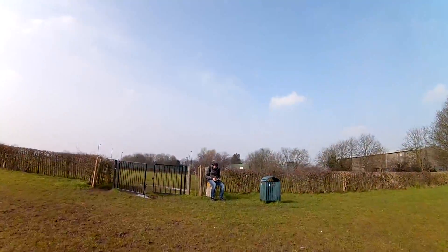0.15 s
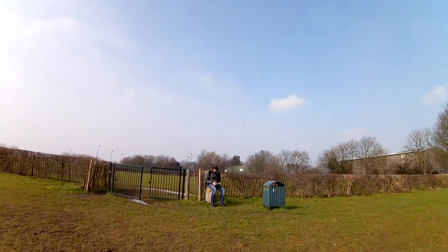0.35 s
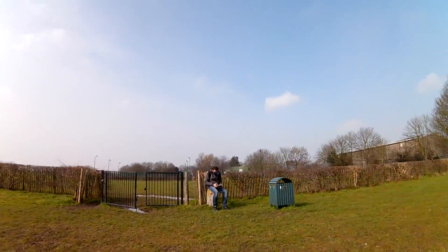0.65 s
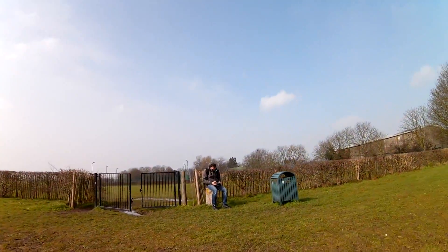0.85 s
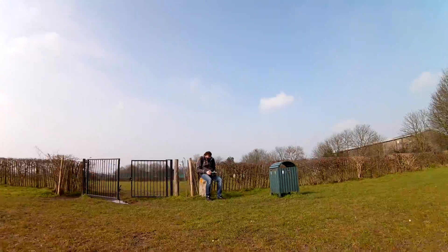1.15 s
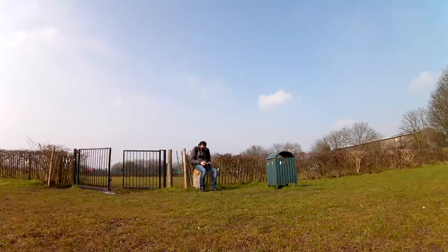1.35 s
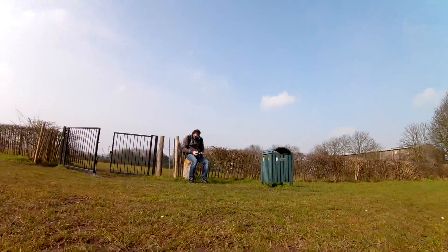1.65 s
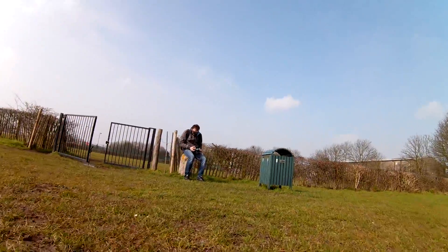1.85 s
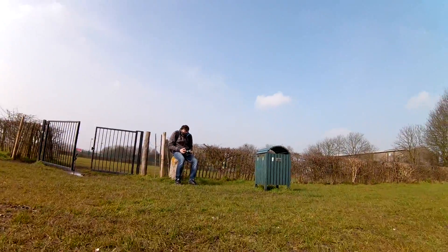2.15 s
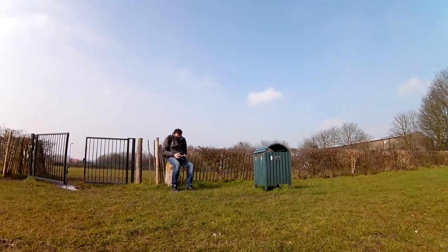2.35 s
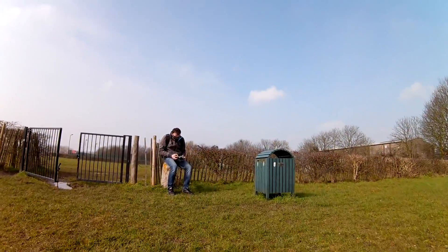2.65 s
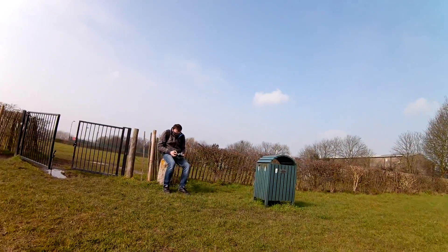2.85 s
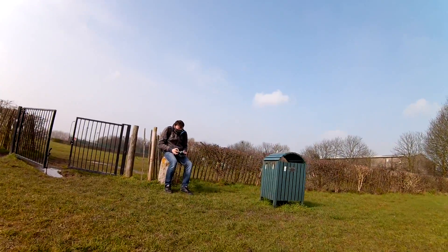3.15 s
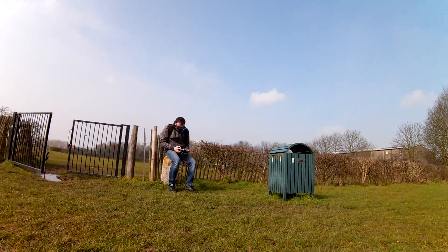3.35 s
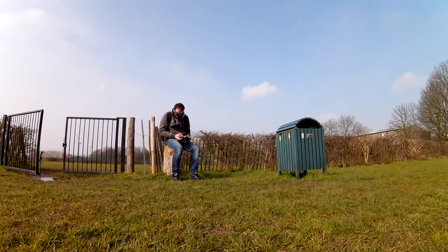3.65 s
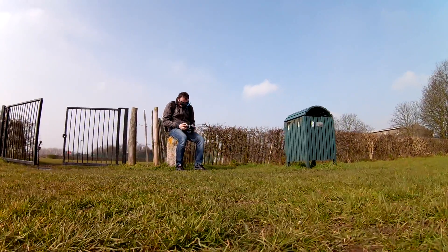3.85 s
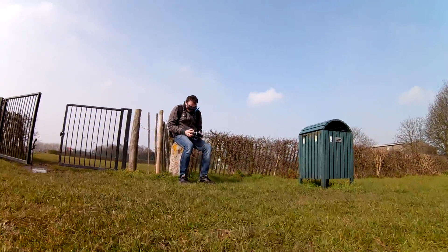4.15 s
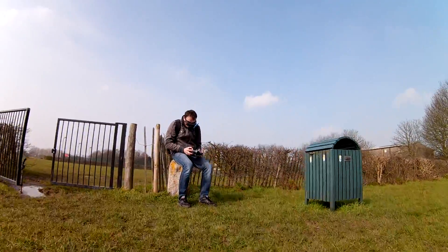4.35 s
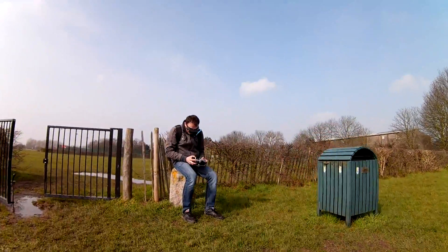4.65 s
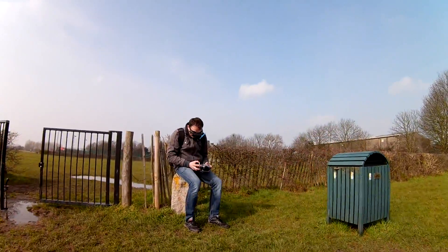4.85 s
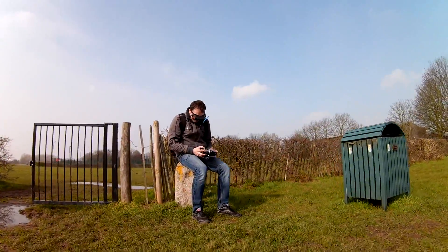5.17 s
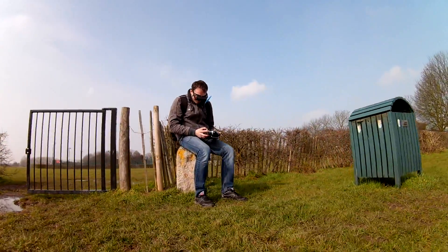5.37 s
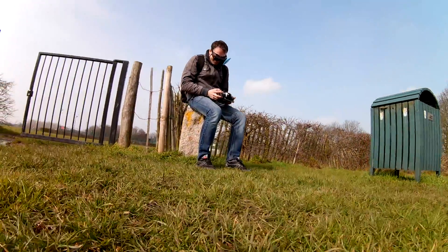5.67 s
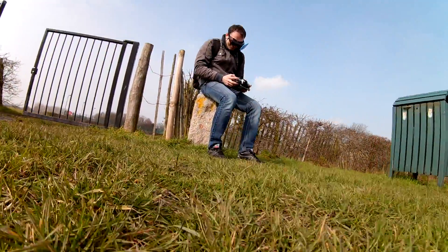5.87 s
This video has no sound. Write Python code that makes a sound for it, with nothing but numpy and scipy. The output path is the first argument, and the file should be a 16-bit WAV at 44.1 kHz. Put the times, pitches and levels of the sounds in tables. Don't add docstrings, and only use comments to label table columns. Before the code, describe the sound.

A microphone on a small racing quadcopter picks up a continuous harsh buzz from beating, slightly detuned rotors. The pitch dips, surges, sags and surges again with throttle. Propeller air hisses in fast pulses, a thin motor whine sits high above, and a loose plastic camera shell rattles in abrupt, distorted bursts. Open field, dry, close, mono, with little deep bass.

```python
import sys
import numpy as np
from scipy import signal
from scipy.fft import rfft, irfft
from scipy.io import wavfile
from scipy.ndimage import uniform_filter1d

SR = 44100
rng = np.random.default_rng(int(sys.argv[2]) if len(sys.argv) > 2 else 0)


def output_pcm(signal):
    pcm = np.clip(np.atleast_2d(signal).T, -1, 1) * 32767
    wavfile.write(sys.argv[1], SR, np.round(pcm).astype(np.int16))


def ratio(d):
    e = np.asarray(d, float) / 20
    return 10 ** e


N = 265041


def to_rms(x, rms_db):
    return x * ratio(rms_db) / np.sqrt(np.mean(x ** 2))


def curves(table):
    time_s, *columns = np.transpose(table)
    return [np.interp(np.arange(N) / SR, time_s, column) for column in columns]


def walk(rate_hz):
    hold = int(SR / rate_hz)
    steps = np.repeat(rng.standard_normal(N // hold + 1), hold)[:N]
    return 1.3 * uniform_filter1d(uniform_filter1d(steps, hold), hold)


def ring(x, hz, width_hz):
    return signal.lfilter(*signal.iirpeak(hz, hz / width_hz, SR), x)


def tone(turn):
    return np.sin(2 * np.pi * (turn + rng.random()))


def speeds():
    # (time [s], fast shaft [Hz], level [dB], slow shaft [Hz], level [dB])
    throttle = [(0, 352, -28, 325, -34), (.2, 331.4, -27.5, 299.3, -37), (.85, 324.6, -27, 286, -35.5),
                (1.0, 352, -26.5, 320.9, -33.5), (1.3, 419.5, -20.5, 390.6, -28.5),
                (2.08, 412.4, -25, 398, -25), (2.42, 406.3, -20, 397, -28), (2.7, 361.2, -27, 352, -33),
                (3.2, 361, -27, 349, -31.5), (3.8, 413.7, -21.5, 380, -27.5), (4.0, 458.1, -19, 414, -22),
                (4.33, 428.9, -20, 418, -27.5), (4.55, 322.5, -28.5, 312, -35),
                (4.9, 289.7, -33, 282, -39.5), (5.0, 343.6, -25.5, 333.2, -30.5),
                (5.25, 354.9, -25.5, 336, -31), (5.66, 448, -19, 398, -25.5),
                (6.01, 399, -21, 284.4, -36.5)]
    # (time [s], length [s], fast shaft change [Hz], slow shaft change [Hz])
    nudges = [(0.909, 0.044, -14.5, -7.5), (1.008, .04, 6.5, 2.5), (1.392, 0.051, 1, -6.5),
              (1.509, 0.067, -17, -9), (1.6, .04, -3, -12.5), (1.755, 0.066, 2.5, -7.5),
              (1.9, 0.065, -6, -11.5), (2.293, 0.075, -6, -4), (3.094, 0.051, -2, 1.5),
              (3.318, 0.052, 17, 9), (3.55, .12, 4, 14), (3.801, 0.051, 0, -5.5), (3.953, .03, 23.5, 16),
              (4.07, 0.038, 6.5, -3.5), (4.16, .05, -17, -4), (4.321, .04, 6, 2), (4.7, 0.045, 6, -4.5),
              (4.9, 0.031, -12, 0.5), (5.397, 0.071, -5, -2.5), (5.511, 0.039, 8, 0), (5.58, .04, -14, -3),
              (5.751, .05, 0.5, 46.5), (5.835, .055, -50, 7.5), (5.9, .03, 14, 2)]
    nudge_db_per_hz, wander_db = .05, 1.27
    fast_hz, fast_db, slow_hz, slow_db = curves(throttle)
    time_s = np.arange(N) / SR
    fast_change_hz, slow_change_hz = np.zeros(N), np.zeros(N)
    for start_s, length_s, fast_step_hz, slow_step_hz in nudges:
        bump = np.exp(-((time_s - start_s) / length_s) ** 2)
        fast_change_hz += fast_step_hz * bump
        slow_change_hz += slow_step_hz * bump
    fast_db = fast_db + nudge_db_per_hz * fast_change_hz + wander_db * walk(22)
    slow_db = slow_db + nudge_db_per_hz * slow_change_hz + wander_db * walk(22)
    return fast_hz + fast_change_hz, fast_db, slow_hz + slow_change_hz, slow_db


def turns(shaft_hz, hunting):
    return np.cumsum(shaft_hz * (1 + hunting * walk(25))) / SR + rng.random()


def rotor(turn, shake_db, lift_db, whine_db=0):
    # (multiple of shaft rate [1], level [dB])
    shaft_orders = [(1, 0), (2, -5), (3, -5), (4, -6), (5, -8), (6, -10), (7, -13)]
    # (multiple of shaft rate [1], level [dB])
    magnet_orders = [(14, -45.5), (28, -38)]
    # (frequency [Hz], width [Hz], level [dB])
    bell_modes = [(8950, 550, 2), (10200, 840, -12)]
    rough_db, flex_turns = 1.4, .024
    flex = flex_turns * ratio(1.5 * (shake_db + 21)) * walk(90)
    shake = np.zeros(N)
    for order, order_db in shaft_orders:
        overtone_db = lift_db if order > 1 else 0
        roughness_db = rough_db * (order - 1) ** .5 * walk(40)
        shake += ratio(order_db + overtone_db + roughness_db) * tone(order * turn + (order - .7) * flex)
    low_whine, high_whine = [ratio(order_db + 1.4 * walk(30.03)) * np.sin(2 * np.pi * order * turn)
                             for order, order_db in magnet_orders]
    low_whine = low_whine * ratio(.3 * (shake_db + 22) + 4 * walk(60))
    bell = sum(ratio(mode_db) * ring(ring(high_whine, hz, width_hz), hz, width_hz)
               for hz, width_hz, mode_db in bell_modes)
    return 2 ** .5 * (ratio(shake_db) * shake + ratio(whine_db) * (low_whine + bell))


def soft_mount(fast_turn, slow_turn, mixed_db):
    # (multiple of fast shaft [1], multiple of slow shaft [1], level [dB])
    mixed_orders = [(1, 1, -8.5), (2, 1, -4.5), (1, 2, -22), (2, 2, -6.5), (3, 1, -18.5)]
    sums = sum(ratio(order_db + 4.9 * walk(40)) * tone(m * fast_turn + n * slow_turn)
               for m, n, order_db in mixed_orders)
    return ratio(mixed_db) * sums


def frame(shake, load_db):
    # (frequency [Hz], width [Hz], level [dB])
    arm_modes = [(851, 98, -12), (1440, 340, -18), (1540, 310, -4)]
    growl_db, steepness = -15.0, 2.2
    buffet = rng.standard_normal(N) * ratio(growl_db + steepness * (load_db + 23.5) + 2.9 * walk(70))
    return shake + sum(ratio(mode_db) * ring(shake + buffet, hz, width_hz) for hz, width_hz, mode_db in arm_modes)


def bounces():
    # (time [s], level [dB], length [ms])
    singles = [(1.381, -10.5, 8), (1.406, -7.5, 10.4), (1.439, -6, 5.3), (1.501, -7.5, 12),
               (1.66, -7.5, 12.2), (1.867, -8, 10.9), (2.085, -7.5, 16.5), (2.109, -9.5, 7.6),
               (2.215, -8, 22.2), (2.278, -6.5, 7.4), (2.349, -8.5, 26.2), (3.09, -7.5, 15.7),
               (3.368, -8, 22), (3.27, -9.5, 8.2), (3.33, -7, 8.7), (3.589, -7, 9.3), (3.66, -8, 27),
               (1.336, -8.5, 14), (3.926, -11, 11.8), (3.971, -10.5, 3.2), (4.175, -6, 8.3),
               (5.213, -9, 11.7), (5.497, -13, 7), (5.54, -9, 5.4), (5.557, -6.5, 10.3), (5.588, -6, 14.8),
               (5.745, -9, 12.7), (5.83, -7, 23.8), (5.884, -7, 6.9), (5.917, -12, 13)]
    # (first [s], last [s], beat [Hz], level [dB], length [ms])
    beat_runs = [
        (1.029, 1.075, 46, -13, 8.7),
        (1.116, 1.298, 27.8, -11.5, 8.4),
        (2.399, 2.487, 56, -6.5, 12.1),
        (3.437, 3.532, 20.4, -10.5, 12.4),
        (5.116, 5.235, 17, -12, 7),
        (5.289, 5.333, 22, -10.5, 10.1),
        (5.371, 5.446, 26, -6.5, 10.7),
    ]
    touches = [1.48, 1.573, 1.624, 1.734, 2.042, 2.372, 2.689, 2.798, 2.968, 3.064, 3.193, 3.247, 3.686,
               3.723, 4.047, 4.339, 4.448, 5.024, 5.09, 5.693, 5.865]
    touch_db, touch_ms = -15.5, 11
    runs = []
    for first_s, last_s, beat_hz, run_db, length_ms in beat_runs:
        count = round((last_s - first_s) * beat_hz) + 1
        runs += [(time_s, run_db, length_ms) for time_s in np.linspace(first_s, last_s, count)]
    return [*singles, *runs, *[(time_s, touch_db, touch_ms) for time_s in touches]]


def chatter(turn, steady_db):
    # (frequency [Hz], width [Hz], level [dB])
    shell_modes = [(1570, 253, -8.5), (2143, 310, -8), (2408, 118.5, 4), (3076, 142, -6.5), (4160, 567, -9),
                   (5980, 133, -19.5), (7050, 170, -64), (9214, 910, -39), (10930, 1600, -30.5),
                   (13900, 900, -41.5)]
    scatter_db, grit, steady_gain_db, build_up_s, soft_hz = 2.0, 0.45, -12.5, 0.0012, 5000
    time_s = np.arange(N) / SR + build_up_s
    power = ratio(2 * (steady_db + steady_gain_db + 1.8 * walk(45)))
    for bounce_s, bounce_db, length_ms in bounces():
        near = slice(max(int((bounce_s - .04) * SR), 0), int((bounce_s + .04) * SR))
        distance = np.abs(time_s[near] - bounce_s) / (0.00067 * length_ms)
        power[near] += ratio(2 * bounce_db) * np.exp(-distance ** 3)
    loose_turn = turn + .12 * walk(150)
    knocks = np.diff(np.floor(loose_turn), prepend=0) > 0
    blows = to_rms(knocks * ratio(scatter_db * rng.standard_normal(N)), 0)
    blows = signal.lfilter(*signal.butter(2, soft_hz, fs=SR), blows)
    scrape = to_rms(rng.standard_normal(N) * np.exp(-(loose_turn % 1) / 1.1), 0)
    drive = ((1 - grit) * blows + grit * scrape) * np.sqrt(power)
    shell = sum((-1) ** k * ratio(mode_db) * ring(drive, hz, width_hz)
                for k, (hz, width_hz, mode_db) in enumerate(shell_modes))
    return shell * ratio(20.0)


def wash(fast_turn, slow_turn, wash_db, low_db):
    # (frequency [Hz], level [dB])
    wash_colour = [(60, -33), (250, -32), (500, -21), (800, -13.5), (1350, 0.5), (2500, -1), (4700, -5),
                   (5600, -17), (7000, -23), (9000, -19.5), (10200, -26.5), (11800, -22.5), (13000, -41),
                   (15000, -65)]
    gating, low_hz = 0.65, 900
    colour_hz, colour_db = np.transpose(wash_colour)
    sweep = 1 + gating * (np.cos(2 * np.pi * fast_turn) + 0.4 * np.cos(2 * np.pi * slow_turn))
    spectrum = rfft(rng.standard_normal(N) * sweep)
    log_hz = np.log(np.arange(1, len(spectrum) + 1) * SR / N)
    air = to_rms(irfft(spectrum * ratio(np.interp(log_hz, np.log(colour_hz), colour_db)), N), 0)
    low = signal.sosfiltfilt(signal.butter(2, low_hz, fs=SR, output="sos"), air)
    return (air - low + ratio(low_db) * low) * ratio(wash_db + 1.0 * walk(14) + 1.0)


def scene():
    # (time [s], shaft [Hz], level [dB])
    far_throttle = [
        (0, 365, -60),
        (.2, 355, -41),
        (.85, 362, -50),
        (1, 404, -41),
        (1.3, 441.4, -33),
        (1.5, 422, -73),
        (6.01, 410, -70),
    ]
    # (time [s], wash [dB], steady chatter [dB], dirtiness of the air [dB])
    air_and_shell = [(0, -21, -15, 4), (.5, -24.5, -17, 10), (1.0, -19.5, -15.5, 13.5),
                     (1.26, -17, -1.5, 8), (1.45, -15, -8.5, 1), (1.75, -18.5, -14, 3.5),
                     (2.3, -17, -13, 0), (2.5, -21, -14, -4), (3.08, -21, -11.5, -17), (3.53, -18, -4, -6),
                     (3.71, -18.5, -31, 4), (4.07, -13.5, -21, 10.5), (4.3, -19, -9, -4),
                     (4.74, -28, -17, 3), (5.0, -20.5, -14, 4), (5.36, -17, -9, 4), (5.69, -16, -14, 8),
                     (5.9, -14.5, -16, 5)]
    hunting = .0065
    fast_hz, fast_db, slow_hz, slow_db = speeds()
    far_hz, far_db = curves(far_throttle)
    wash_db, steady_db, low_db = curves(air_and_shell)
    lift_db = -0.44 - 0.8 * walk(4)
    fast_turn = turns(fast_hz, hunting * ratio((fast_db + 24) / 2))
    slow_turn = turns(slow_hz, hunting * ratio((slow_db * 0 + fast_db + 24) / 2))
    far_turn = turns(far_hz, 0.003058)
    shake = rotor(fast_turn, fast_db, lift_db)
    shake = shake + rotor(slow_turn, slow_db, lift_db, whine_db=-1)
    shake = shake + rotor(far_turn, far_db, lift_db, whine_db=far_db + 43)
    shake = shake + soft_mount(fast_turn, slow_turn, (fast_db + slow_db) / 2 + lift_db)
    mix = frame(shake, fast_db) + chatter(fast_turn, steady_db) + wash(fast_turn, slow_turn, wash_db, low_db)
    return mix[None]


def band_limit(x):
    return signal.sosfilt(signal.butter(12, 15570, fs=SR, output="sos"), x)


def record(dry):
    # (frequency [Hz], width [Hz])
    port_notches = [(7960, 1000), (7960, 350), (13450, 1500), (13450, 300)]
    bass_cut_hz, top_hz = 162, 14650
    x = signal.sosfilt(signal.butter(2, bass_cut_hz, "high", fs=SR, output="sos"), dry)
    ceiling = np.where(x > 0, 1.05, 1.15)
    x = x / (1 + np.abs(x / ceiling) ** 6) ** (1 / 6)
    for hz, width_hz in port_notches:
        x = signal.lfilter(*signal.iirnotch(hz, hz / width_hz, SR), x)
    x = signal.sosfilt(signal.cheby1(6, 1, top_hz, fs=SR, output="sos"), x)
    rumble = signal.lfilter(*signal.butter(1, 150, fs=SR), rng.standard_normal(N))
    x = x + to_rms(rumble, -76)
    return band_limit(np.clip(x, -1, 1))


dry = scene()
out = record(dry)
output_pcm(out)
```